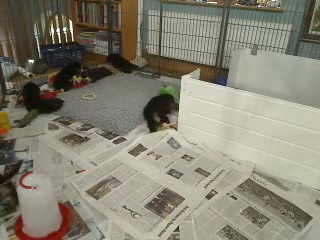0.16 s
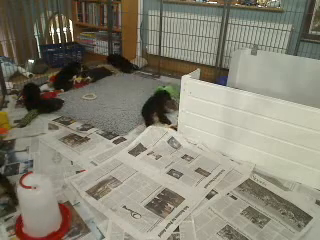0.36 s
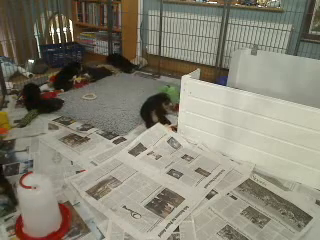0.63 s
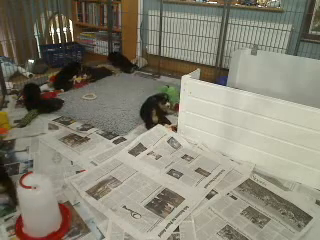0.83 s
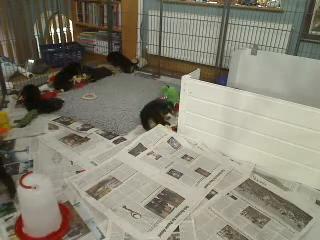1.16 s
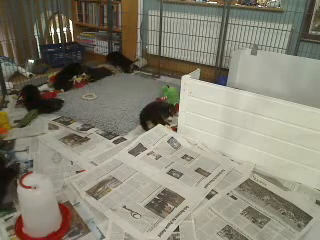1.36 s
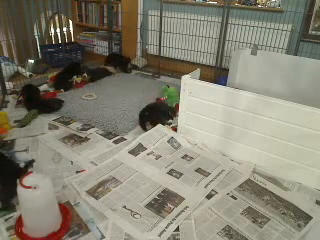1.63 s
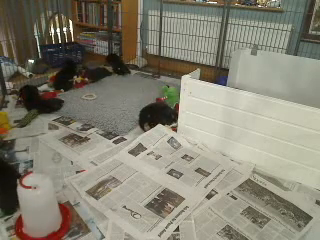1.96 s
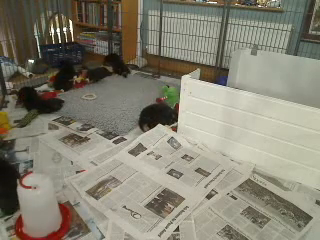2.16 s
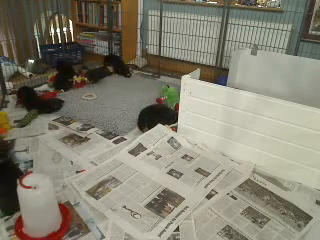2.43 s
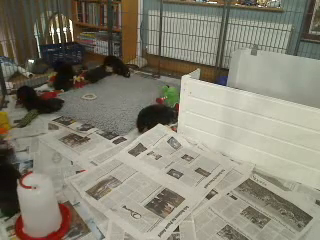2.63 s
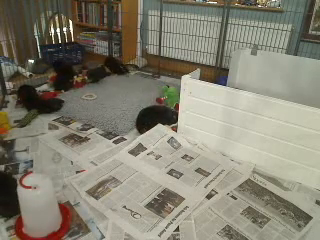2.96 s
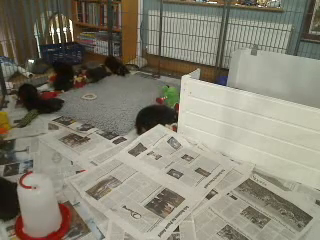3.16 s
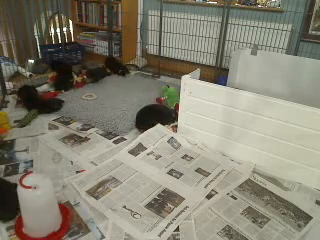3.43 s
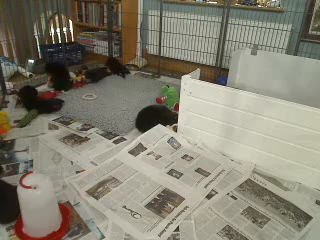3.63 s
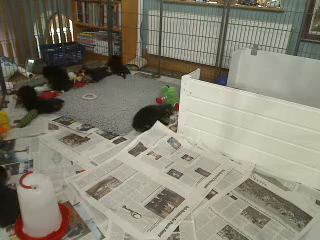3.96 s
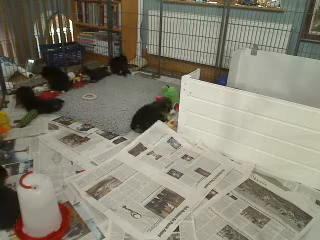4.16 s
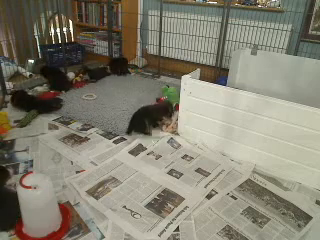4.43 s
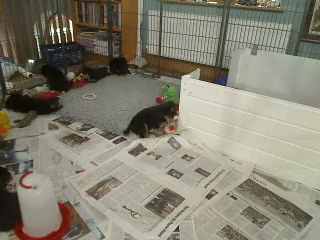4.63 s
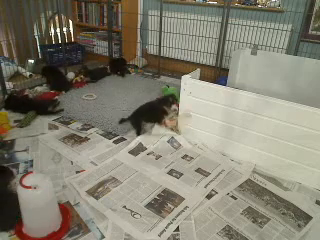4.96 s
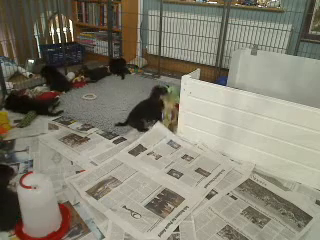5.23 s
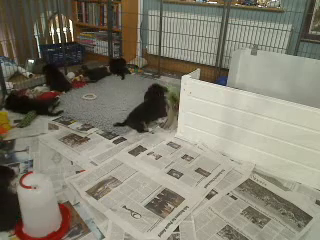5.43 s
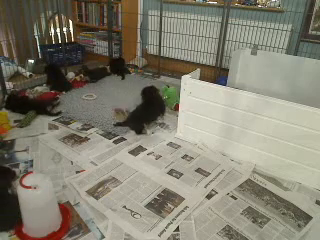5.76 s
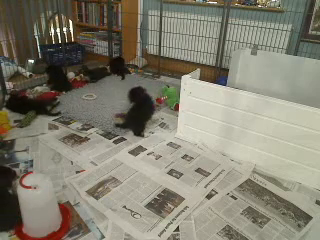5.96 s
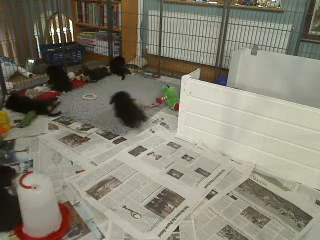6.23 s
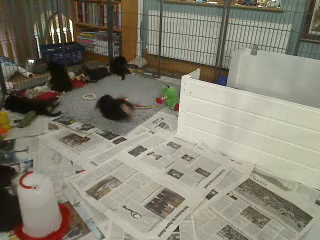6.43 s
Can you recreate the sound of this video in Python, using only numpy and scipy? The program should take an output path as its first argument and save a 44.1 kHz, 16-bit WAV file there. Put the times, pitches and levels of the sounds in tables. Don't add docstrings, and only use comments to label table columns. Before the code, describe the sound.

A small puppy whines in short falling cries, bursts into one sharp loud yelp, then whimpers lower while paws scratch and rustle newspaper indoors.

```python
import sys
import numpy as np
from scipy import signal
from scipy.fft import rfft, irfft
from scipy.io import wavfile
from scipy.ndimage import uniform_filter1d

SR = 44100
rng = np.random.default_rng(int(sys.argv[2]) if len(sys.argv) > 2 else 0)


def rack_gain(trim_db):
    fader = np.asarray(trim_db, float)
    return 10 ** (fader / 20)


def unload_wav(signal):
    wavfile.write(
        sys.argv[1],
        SR,
        np.round(np.clip(np.atleast_2d(signal).T, -1, 1) * 32767).astype(np.int16),
    )


N = 290089

# frequency in Hz, density in dB per Hz.
HISS_SPECTRUM = [(30, -38), (64, -34.5), (135, -13.5), (273, -29), (330, 3), (1150, -1.5), (1490, -18),
                 (9910, -23.5)]
HISS_DB = -66.5
# frequency in Hz, rms level in dB.
MAINS_HUM = [(100, -70), (200, -79)]
# frequency in Hz, time to fall 60 dB in seconds, level in dB.
ROOM_DECAY = [(298, 0.3, -3.5), (890, 0.187, 3), (2030, 0.406, -2.5), (8000, 0.16, -2.5)]

# time in seconds, level in dB.
RESTLESSNESS = [(0.0, 1.5), (0.45, 0.5), (0.95, -4), (1.15, 1), (1.4, 1), (1.75, -1), (2.2, -0.5),
                (2.8, 1.5), (3.2, 0.5), (3.7, -0.5), (4.02, 3.5), (4.35, 1), (4.75, 2.5), (5.1, 1),
                (5.35, 1.5), (5.65, -4.5), (5.95, -4.5), (6.58, 2)]
THUD_DB, SCUFF_DB, SWISH_DB, PAPER_BED_DB = -64.5, -68, -86.5, -71
THUD_FOLLOWS, SCUFF_FOLLOWS, SWISH_FOLLOWS, PAPER_FOLLOWS = .9, 1, 1.2, 1.4
SCUFF_WITH_PAWS_DB, SWISH_WITH_PAWS_DB = -20, -21.5
# (if negative, the time to rise 20 dB, with a faster fall after the peak).
PAW_STROKES = [(0.01, -45, -5, 0.0691), (0.22, -66.5, -0.5, 0.29), (0.34, -67.5, -2.5, 0.45),
               (0.468, -58, 2, 0.1682), (0.57, -66, -11.5, 0.29), (0.891, -61, -14.5, 0.0774),
               (1.431, -63, 6.5, -0.0032), (1.479, -51.5, 1, 0.0916), (1.573, -60.5, 4.5, 0.0957),
               (1.79, -64.5, -9, -0.08), (1.868, -62.5, -8, 0.01), (2.205, -62, -21.5, -0.49),
               (5.5, -73, 7, 0.1959), (3.206, -68.5, 1, 0.25), (3.77, -65, -15, 0.24),
               (4.16, -61, -9.5, 0.21), (4.24, -69, 3, 0.5344), (4.398, -63, 4, 0.2),
               (4.561, -53, 2, 0.0464), (4.69, -68, 3.5, 0.3363), (4.821, -57.5, 4, 0.06),
               (4.871, -52, 3.5, 0.0859), (4.968, -51.5, 4.5, 0.0545), (6.315, -68, 11.5, 0.55),
               (5.23, -63, -6, 0.15), (5.299, -52, -23, 0.0923), (5.64, -62, -17, -0.0067),
               (6.015, -65.5, 2, 0.135), (6.379, -42, 4.5, 0.1158), (6.42, -45, -5, .17)]
STROKE_RISE_SHARE, STROKE_RISE_MAX_S = 0.504, .022
# start in seconds, peak level in dB, centre in Hz,
# time to fall 60 dB in seconds.
PAPER_SNAPS = [(0.0376, -43, 2605, 0.029), (0.2178, -51.5, 5220, 0.03), (0.3328, -48, 1580, 0.045),
               (0.4493, -44.5, 2140, 0.128), (0.5731, -50.5, 2000, 0.024), (0.89, -51.5, 4690, 0.0175),
               (1.064, -59, 2080, 0.033), (1.421, -61.5, 1510, 0.024), (1.4718, -39.5, 1433, 0.035),
               (1.5664, -52.5, 2520, 0.03), (1.7747, -53, 3640, 0.13), (1.865, -54, 3800, 0.03),
               (2.2003, -52, 1650, 0.019), (2.3462, -53, 898, 0.026), (3.2039, -55, 3196, 0.037),
               (4.149, -49.5, 2706, 0.031), (4.5615, -44, 2752, 0.034), (4.685, -48.5, 4921, 0.046),
               (4.8615, -41, 2570, 0.03), (4.9579, -53.5, 3490, 0.036), (5.2216, -54.5, 2250, 0.036),
               (5.2803, -50.5, 4370, 0.02), (5.308, -47.5, 1880, 0.074), (6.0031, -63, 1287, 0.047),
               (6.3699, -35, 5600, 0.016), (6.379, -32, 5920, 0.015), (6.4107, -39, 3900, 0.063)]
SNAP_ATTACK_S = .003

# centre in Hz, width in Hz, gain in dB.
THROAT_RESONANCES = [(1060, 300, -4), (1540, 420, 0), (2200, 400, -29), (2600, 500, -27), (3450, 700, -4),
                     (4300, 900, 0), (5300, 900, -2), (6400, 800, -14)]
# centre in Hz, width in Hz, gain in dB.
SHRIEK_RESONANCES = [(1190, 90, -12), (1460, 50, 0), (1750, 60, -5), (2200, 120, -9), (2950, 300, -18),
                     (3450, 200, -18), (4300, 300, -14)]
SHRIEK_S, SHRIEK_HOLD_S, SHRIEK_DB = 2.475, 0.0453, -20.5
SHRIEK_RISE_DB_PER_S, SHRIEK_FALL_DB_PER_S = 1301, 649.5

# time in seconds, pitch in Hz, level in dB, mouth opening as overtones over
# the fundamental in dB.
WHINE_1 = [
    (1.0, 741.9, -68.5, -6),
    (1.062, 875, -50, -2),
    (1.105, 850, -53.5, 1),
    (1.125, 785, -42, -3.5),
    (1.18, 640.8, -46.5, -10),
    (1.225, 518, -42, -6.5),
    (1.435, 505, -45, -7.5),
    (1.475, 455, -50, 4.5),
    (1.55, 452.3, -62, 6),
]
WHINE_2 = [
    (1.862, 712.2, -58, 3.5),
    (1.887, 783, -48.5, 9.5),
    (1.932, 880, -49.5, 4),
    (1.994, 920, -52, 2),
    (2.025, 835, -34.5, 6),
    (2.07, 808, -45.5, 10),
    (2.175, 812.6, -43, 6),
    (2.205, 751.2, -49, -6),
    (2.27, 712.6, -66.5, -6),
]
LEAP = [
    (2.422, 1063, -44, 8),
    (2.43, 1071, -32, 7.6),
    (2.455, 1099, -24.5, 10.84),
    (2.478, 1271, -22.5, 15),
]
FALL = [
    (2.488, 1149, -35, 9),
    (2.538, 1020, -28.5, 16.5),
    (2.6, 955.8, -28, 17),
    (2.642, 890, -30.5, 10.5),
    (2.73, 866, -25.5, 10),
    (2.795, 844, -38, 3),
    (2.835, 791.7, -31, -2),
    (2.895, 769, -37.5, -3.5),
]
SOB = [
    (2.905, 767, -38.5, -1),
    (2.95, 748, -32, -9),
    (3.0, 712.9, -36.5, -6),
    (3.044, 640.4, -35, -11),
    (3.08, 590.7, -40.5, -16),
    (3.125, 578, -46.5, -18.5),
    (3.16, 580, -68.5, -18.5),
]
WHINE_3 = [
    (3.305, 677.5, -61, -12),
    (3.33, 690, -44, 2),
    (3.372, 868.8, -45.5, -12.5),
    (3.43, 695, -40.5, -2),
    (3.505, 672, -47, 8),
    (3.555, 679.1, -38.5, -3.5),
    (3.605, 733.7, -41, -14.5),
    (3.66, 700.6, -44, -19),
    (3.73, 690, -64.5, -16),
]
WHINE_4 = [
    (3.838, 558.8, -66, -18.5),
    (3.854, 546.3, -43.5, -16.5),
    (3.882, 530.8, -48.5, -14),
    (3.909, 547.6, -37.5, -23.5),
    (3.975, 562.9, -55, -21),
    (3.998, 544.9, -38.5, -26),
    (4.02, 486.1, -47.5, -4),
    (4.06, 524.9, -48, -20.5),
    (4.12, 509.7, -65.5, -17.5),
]
WHINE_5 = [
    (4.476, 540, -42.5, -25.5),
    (4.51, 505.3, -54.5, -23.5),
    (4.558, 541, -40.5, -14.5),
    (4.59, 468.6, -52.5, -16.5),
    (4.616, 466.7, -38.5, -26),
    (4.642, 480.1, -56, -20.5),
    (4.671, 515.6, -42.5, -21),
    (4.745, 514.8, -51, -31.5),
    (4.79, 505, -76, -14.5),
]
CRIES = [WHINE_1, WHINE_2, LEAP, FALL, SOB, WHINE_3, WHINE_4, WHINE_5]
HOARSENESS = [
    (.45, .13, .35),
    (.15, .1, .4),
    (.35, .12, .2),
    (.55, .08, .1),
    (.1, .25, .55),
    (.5, .25, .5),
    (.4, .4, .4),
    (.4, .4, .45),
]
SETTLE_S, FRAY_S = .11, .06
# share against the level in dB, time until free in seconds,
# loss in dB per second.
BRIGHT_OVERTONES = [
    (-13.5, 0.064, 24),
    (-7, .1, 0.5),
    (-3, .004, 0.5),
    (-4.5, .001, 27.5),
    (-9.5, .04, 2.5),
    (-8, 0.0293, 45),
    (-26.5, .02, 0),
    (-25, .02, -1),
]
BRIGHT_FOLLOWS_MOUTH = .3


def rms_one(x):
    return x / np.sqrt(np.mean(x ** 2) + 1e-20)


def drift(rate):
    r = np.exp(-2 * np.pi * rate / SR)
    run_in = 20000
    slow = signal.lfilter([1], [1, -2 * r, r * r], rng.standard_normal(N + run_in))
    return rms_one(slow[run_in:])


def band(x, low_hz, high_hz, order=2):
    return signal.sosfilt(signal.butter(order, [low_hz, high_hz], "band", fs=SR, output="sos"), x)


def resonate(x, hz, width):
    r = np.exp(-np.pi * width / SR)
    poles = [1, -2 * r * np.cos(2 * np.pi * hz / SR), r * r]
    return signal.lfilter([(1 - r * r) / 2, 0, (r * r - 1) / 2], poles, x)


def in_time(tables, silent_db=-100):
    t, gate_db = np.arange(N) / SR, np.full(N, float(silent_db))
    for table in tables:
        start, end = table[0][0], table[-1][0]
        edges = [start - .006, start, end, end + .015]
        gate_db = np.maximum(gate_db, np.interp(t, edges, [silent_db, 0, 0, silent_db]))
    s, *columns = np.transpose(sorted(row for table in tables for row in table))
    return [gate_db] + [np.interp(t, s, c) for c in columns]


def background():
    hiss, edges = 0, 28 * 2 ** np.arange(0, 9, .5)
    white = rng.standard_normal((2, N))
    hz, db = np.transpose(HISS_SPECTRUM)
    for k, (low, high) in enumerate(zip(edges, edges[1:])):
        centre_db = np.interp(np.log(low * high) / 2, np.log(hz), db)
        hiss = hiss + rack_gain(centre_db) * band(white[k % 2], low, high)
    t = np.arange(N) / SR
    hum = sum(np.sqrt(2) * rack_gain(level) * np.sin(2 * np.pi * f * t) for f, level in MAINS_HUM)
    return rack_gain(HISS_DB - 6.5) * rms_one(hiss) + hum * rack_gain(.7 * drift(3.))


def room(x):
    t, tail = np.arange(SR // 2) / SR, 0
    hz, t60, db = np.transpose(ROOM_DECAY)
    for low in 125 * 2 ** np.arange(7):
        decay, level_db = (np.interp(np.log(low * 1.173), np.log(hz), c) for c in (t60, db))
        noise = rms_one(band(rng.standard_normal(len(t)), low, 2 * low))
        noise = noise * np.sqrt(low / decay / 16000)
        tail = tail + noise * rack_gain(level_db - 60 * t / decay)
    tail *= np.clip((t - .003) / .006, 0, 1)
    return signal.fftconvolve(x, tail * np.sqrt(2 * np.log(1000) / SR))[:N]


def shuffle(dull_paws, paws):
    stir_db = in_time([RESTLESSNESS])[1]
    thud_gain = rack_gain(THUD_DB + THUD_FOLLOWS * stir_db + 1.6 * drift(4.0))
    thud = rms_one(band(rng.standard_normal(N), 130, 520)) * thud_gain
    scuff_gain = rack_gain(SCUFF_DB + SCUFF_FOLLOWS * stir_db + 3.2 * drift(9.0))
    scuff_gain = scuff_gain + rack_gain(SCUFF_WITH_PAWS_DB) * dull_paws
    scuff = rms_one(band(rng.standard_normal(N), 590, 1700)) * scuff_gain
    swish_gain = rack_gain(SWISH_DB + SWISH_FOLLOWS * stir_db) + rack_gain(SWISH_WITH_PAWS_DB) * paws
    swish = rms_one(band(rng.standard_normal(N), 5500, 11000)) * swish_gain * rack_gain(3.8 * drift(23.0))
    return thud + scuff + swish


def stroke_levels():
    t = np.arange(0, N / SR, .001)
    bed_db = PAPER_BED_DB + PAPER_FOLLOWS * np.interp(t, *np.transpose(RESTLESSNESS))
    power = rack_gain(2 * bed_db) * np.array([[1], [.4]])
    for s, db, bright_db, fall_s in PAW_STROKES:
        rise_s = min(fall_s * STROKE_RISE_SHARE, STROKE_RISE_MAX_S)
        shape_db = -20 * np.maximum((t - s) / fall_s, (s - t) / rise_s)
        power = power + rack_gain(2 * (db + shape_db)) * rack_gain([[0], [2 * bright_db]])
    return [np.interp(np.arange(N) / SR, t, np.sqrt(p)) for p in power]


def rustle(dull_gain, bright_gain, creases_per_s=2500, spread_db=2.2):
    sizes = rack_gain(spread_db * np.minimum(rng.exponential(1, N), 5)) * rng.choice([-1, 1], N)
    chance = creases_per_s * rack_gain(2.2 * drift(45.)) / SR
    creases = rms_one(sizes * (rng.random(N) < chance))
    paper = creases + 0.77 * rng.standard_normal(N)
    dull = rms_one(band(paper, 1900, 4882, order=3)) * dull_gain * rack_gain(0.45 * drift(32.0))
    bright = rms_one(band(paper, 3193, 6680)) * bright_gain * rack_gain(1.5 * drift(40.))
    return dull + bright


def snaps():
    out, t = np.zeros(N), np.arange(int(.12 * SR)) / SR
    noises = rng.standard_normal((len(PAPER_SNAPS), len(t)))
    for (s, db, hz, t60), noise in zip(PAPER_SNAPS, noises):
        burst = noise * rack_gain(-60 * t / max(t60, .003)) * np.minimum(t / SNAP_ATTACK_S + .2, 1)
        burst = resonate(burst, hz, .15 * hz) + .12 * band(burst, .5 * hz, min(2.5 * hz, 10000))
        at = round(s * SR)
        out[at:at + len(t)] += rack_gain(db + 5.5) * burst / np.abs(burst).max()
    return out


def throat_gain(hz):
    gain = .004
    for centre, width, db in THROAT_RESONANCES:
        off = np.square(2 * (hz - centre) / width)
        gain = gain + rack_gain(db) / (1 + off ** 3)
    return gain


def voice_controls():
    whole_yelp = LEAP + FALL + SOB
    gate_db, pitch, level_db, open_db = in_time(CRIES[:2] + [whole_yelp] + CRIES[5:])
    t = np.arange(N) / SR
    which = np.clip(np.searchsorted([cry[0][0] - .003 for cry in CRIES], t) - 1, 0, None)
    since = np.abs(t - np.array([cry[0][0] for cry in CRIES])[which])
    until = np.abs(t - np.array([cry[-1][0] for cry in CRIES])[which])
    first, steady, last = np.array(HOARSENESS)[which].T
    hoarse = steady + (first - steady) * np.exp(-since / SETTLE_S) + (last - steady) * np.exp(-until / FRAY_S)
    first_db = level_db - 10 * np.log10(1 + rack_gain(2 * open_db))
    share_db, free_s, loss_db = np.array(BRIGHT_OVERTONES)[which].T
    bright_db = level_db + share_db - loss_db * since + BRIGHT_FOLLOWS_MOUTH * open_db
    bright_db = bright_db - 20 * np.clip(1 - since / np.abs(free_s), 0, 1)
    bright_db = uniform_filter1d(bright_db, size=400)
    return gate_db, pitch, first_db, first_db + open_db, bright_db, np.clip(hoarse, 0, .9)


def whine(jitter=.007, shimmer_db=3.0, throb_db=1.5):
    gate_db, pitch, first_db, mouth_db, bright_db, hoarse = voice_controls()
    unsteady = pitch * (1 + jitter * (1 + 3.4 * hoarse) * drift(46.16))
    phase = 2 * np.pi * np.cumsum(unsteady) / SR
    flutter = drift(70.), drift(95.0), drift(70.)
    groups, powers = np.zeros((2, N)), np.full((2, N), 1e-6)
    for k in range(2, 14):
        hz = k * pitch
        bright = np.clip((hz - 2500) / 400, 0, 1)
        shares = throat_gain(hz) * np.array([1 - bright, bright])
        shimmer = rack_gain(shimmer_db * (.2 + .9 * bright) * drift(10.))
        uneven = shimmer + (.12 + hoarse) * (.5 + bright) * flutter[k % 3]
        groups += shares * np.sin(k * phase + k * k) * uneven
        powers += shares ** 2 / 2
    mouth, top_end = groups / np.sqrt(powers)
    hz = np.arange(N // 2 + 1) * SR / N
    air = rfft(rng.standard_normal(N)) * throat_gain(hz) * (hz > 900)
    puff = 1 + .5 * np.sin(phase)
    mouth = mouth + hoarse ** 2 * puff * rms_one(irfft(air * (hz < 2500), N))
    top_end = np.sqrt(1 - hoarse) * top_end + hoarse * puff * rms_one(irfft(air * (hz > 2500), N))
    first_gain = np.sqrt(2) * rack_gain(first_db + throb_db * drift(27.0))
    first = first_gain * np.sin(phase) * (1 + 0.846 * hoarse * flutter[1])
    voice = rack_gain(gate_db) * (first + rack_gain(mouth_db - 2.0) * mouth + rack_gain(bright_db - 2.5) * top_end)
    return band(voice, 380, 7300, order=3)


def shriek():
    late = np.arange(N) / SR - SHRIEK_S
    rise_db, fall_db = -late * SHRIEK_RISE_DB_PER_S, (late - SHRIEK_HOLD_S) * SHRIEK_FALL_DB_PER_S
    level_db = SHRIEK_DB - np.maximum(0, np.maximum(rise_db, fall_db))
    slaps = rng.standard_normal(N) * (rng.random(N) < 2200 / SR)
    slaps = slaps + 0.05 * rng.standard_normal(N)
    throat = 0
    for k, (hz, width, db) in enumerate(SHRIEK_RESONANCES):
        throat = throat + (-1) ** k * rack_gain(db) * resonate(slaps, hz, width)
    return rack_gain(level_db) * rms_one(band(throat, 1080, 7500, order=6))


def scene():
    dull, bright = stroke_levels()
    voice = whine() + shriek()
    paper = rustle(dull, bright) + snaps()
    wet = room(rack_gain(-3) * voice + rack_gain(-8) * paper)
    direct = rack_gain(-2) * voice + rack_gain(-2.5) * paper
    return (direct + wet + shuffle(dull, bright) + background())[None]


def top_cut(x):
    return signal.sosfilt(signal.butter(12, 10060, fs=SR, output="sos"), x)


def record(dry):
    loud_limit_db, faint_limit_db = -38, -87
    x = signal.sosfilt(signal.ellip(10, .3, 60, 10000, fs=SR, output="sos"), dry)
    low, mid, high = (signal.sosfiltfilt(signal.ellip(8, .2, 35, hz, fs=SR, output="sos"), x)
                      for hz in (6500, 7300, 8600))
    top = x - high
    release = 80 * np.arange(N) / SR
    loud_db = 10 * np.log10(uniform_filter1d(band(x, 300, 2600) ** 2, size=1500) + 1e-12)
    capped_db = np.minimum(loud_db, loud_limit_db + 4)
    held_db = np.maximum.accumulate(capped_db + release, axis=1) - release
    shut = np.clip((held_db - loud_limit_db) / 2 + 1, 0, 1)
    lower_shut = shut * np.clip(10 * (drift(4.) - .5), 0, 1)
    top_db = 10 * np.log10(uniform_filter1d(top ** 2, size=1000) + 1e-14)
    top_shut = np.maximum(shut, np.clip((faint_limit_db - top_db) / 2, 0, .9))
    kept = low + (1 - lower_shut) * (mid - low) + (1 - shut) * (high - mid) + (1 - top_shut) * top
    return top_cut(kept)


dry = scene()
out = record(dry)
unload_wav(out)
```